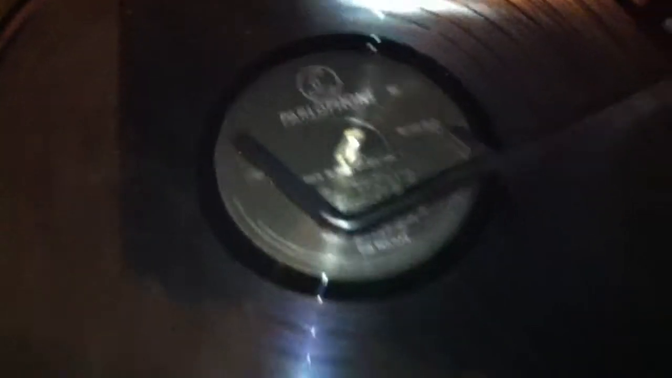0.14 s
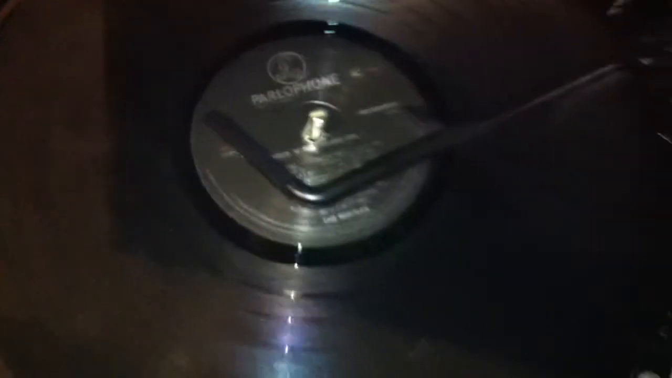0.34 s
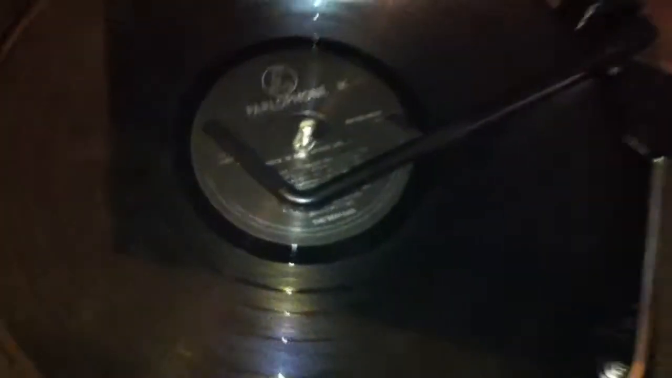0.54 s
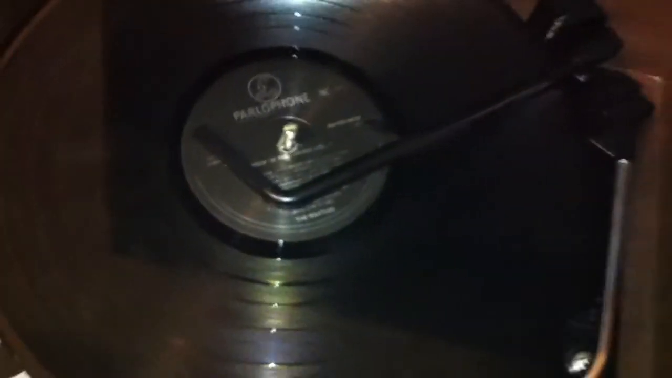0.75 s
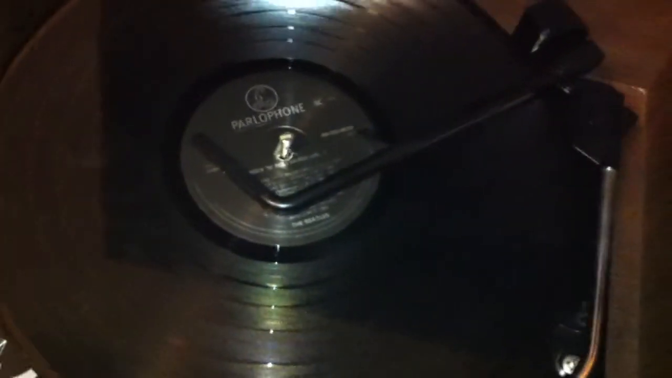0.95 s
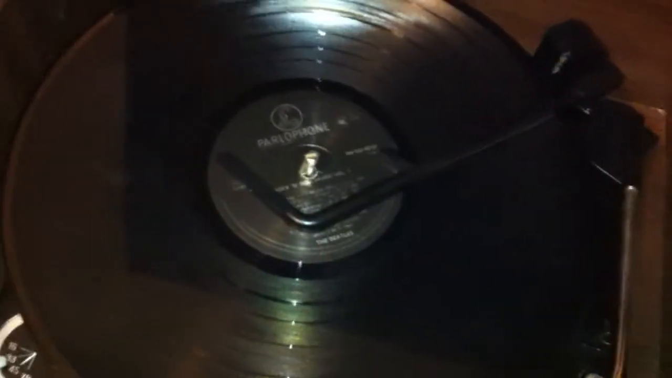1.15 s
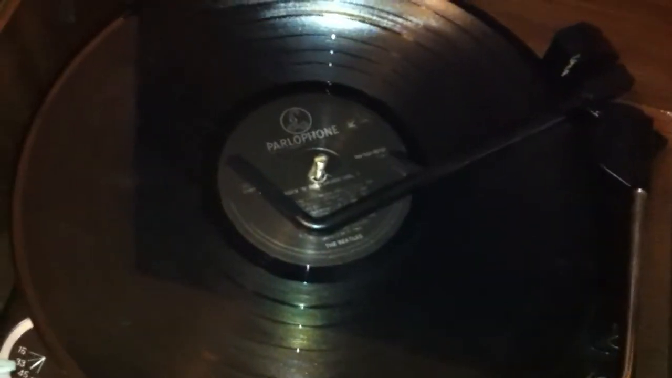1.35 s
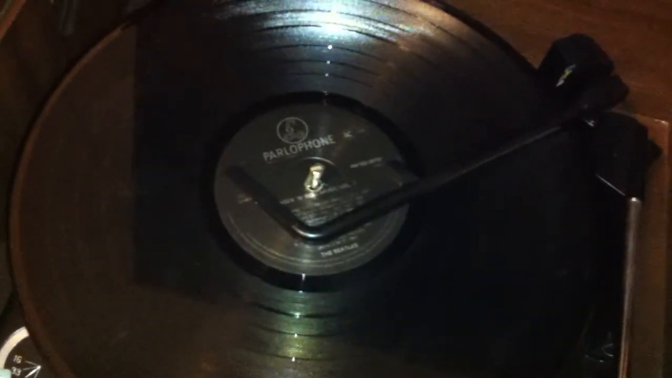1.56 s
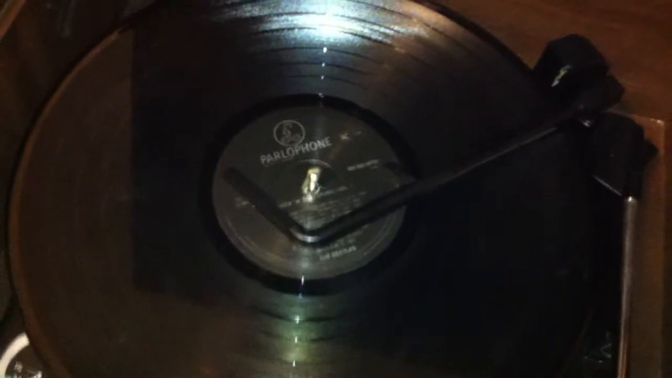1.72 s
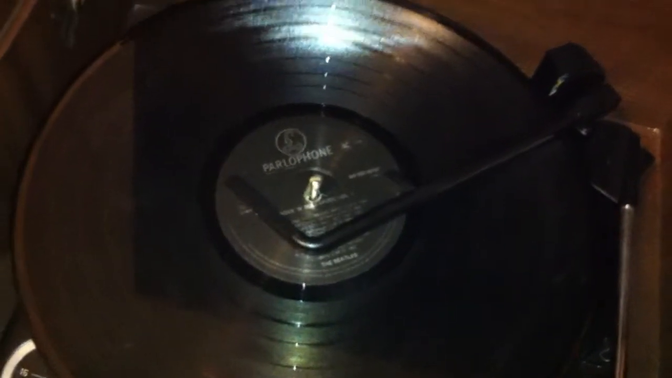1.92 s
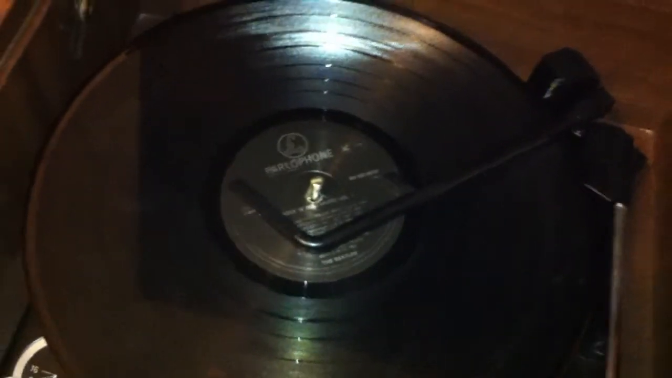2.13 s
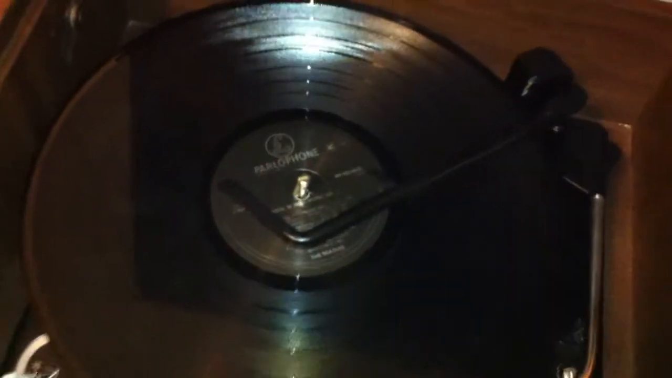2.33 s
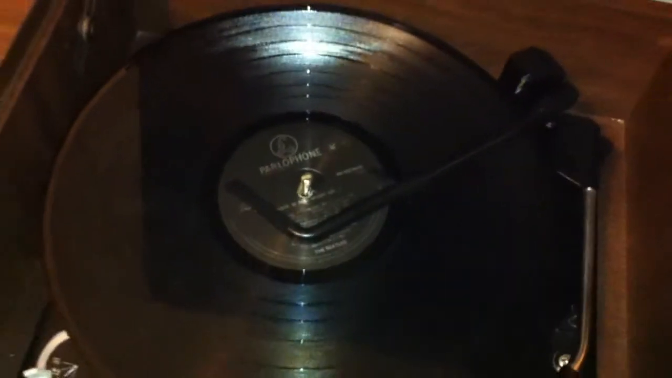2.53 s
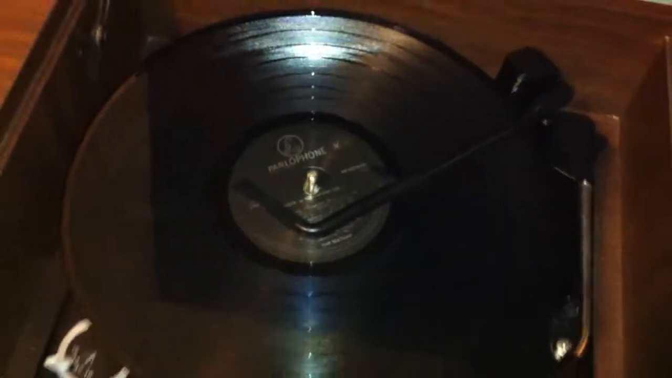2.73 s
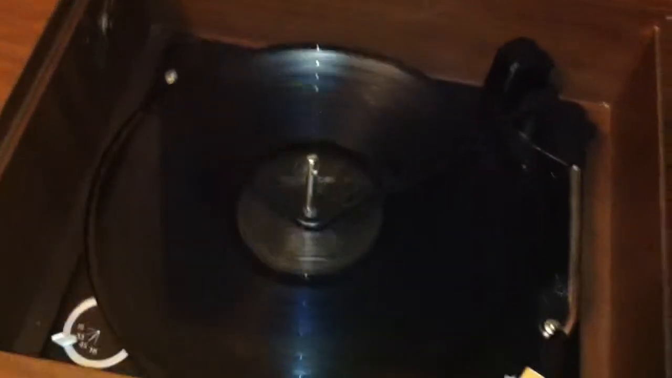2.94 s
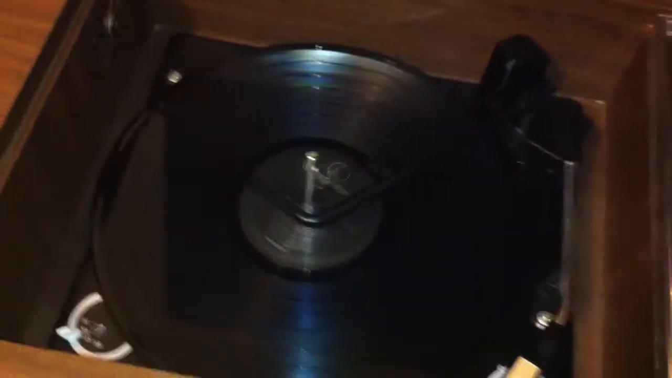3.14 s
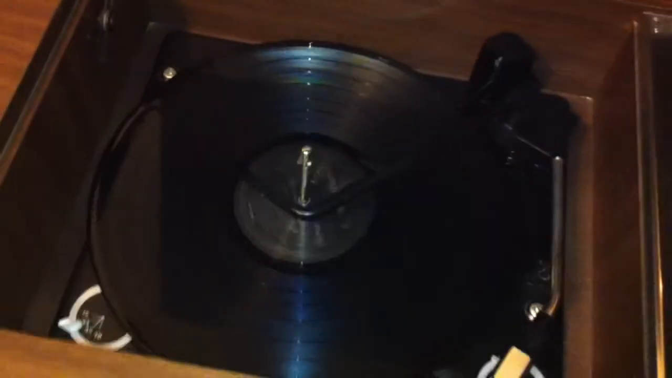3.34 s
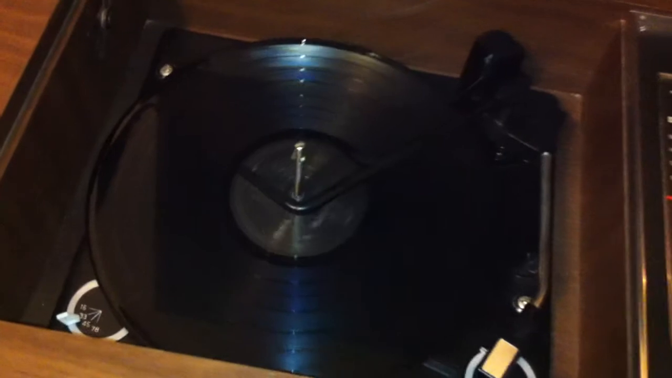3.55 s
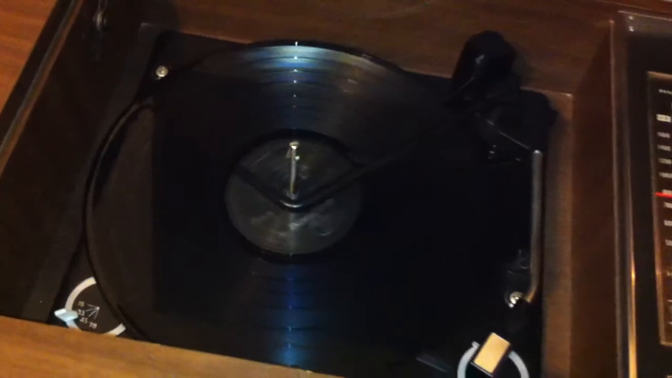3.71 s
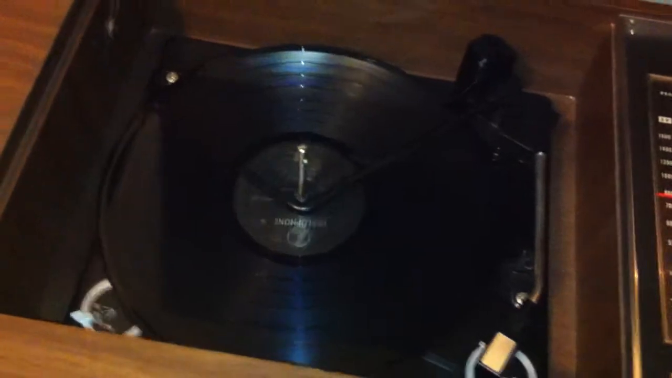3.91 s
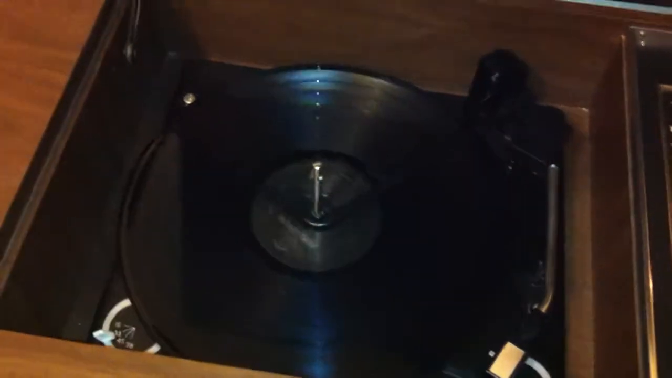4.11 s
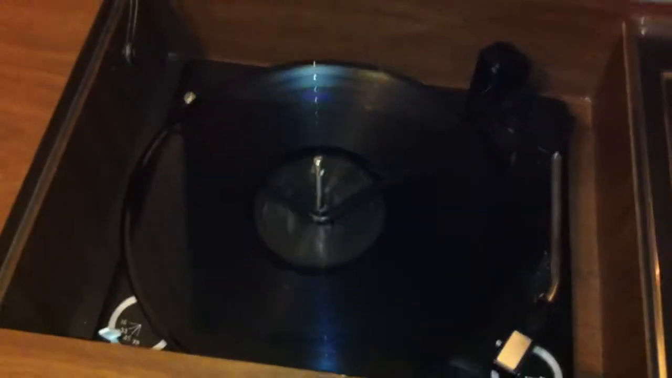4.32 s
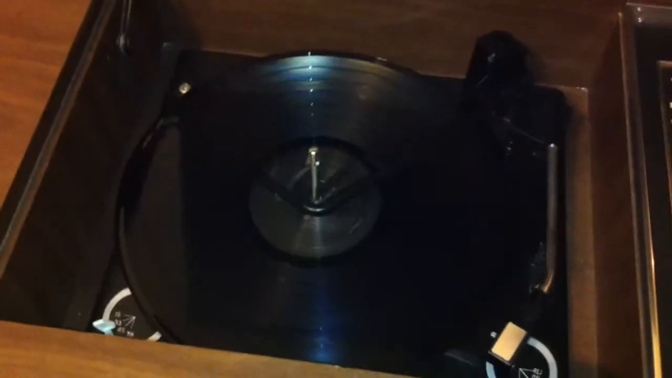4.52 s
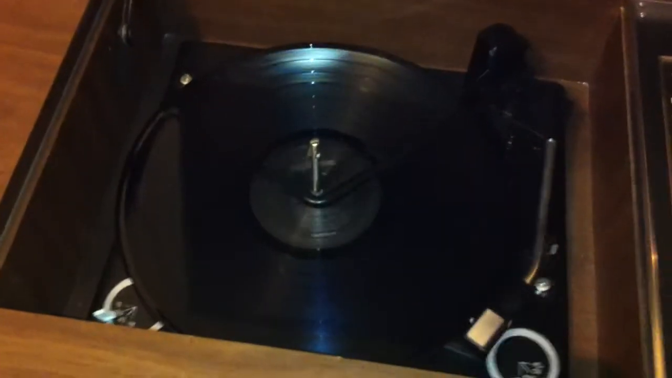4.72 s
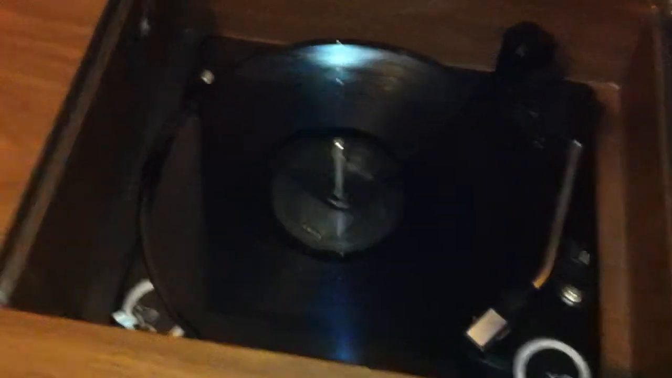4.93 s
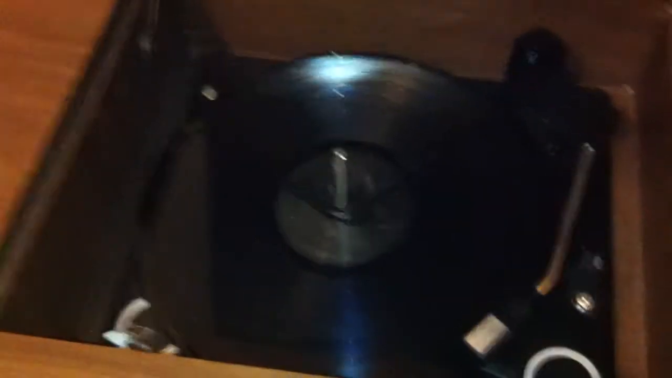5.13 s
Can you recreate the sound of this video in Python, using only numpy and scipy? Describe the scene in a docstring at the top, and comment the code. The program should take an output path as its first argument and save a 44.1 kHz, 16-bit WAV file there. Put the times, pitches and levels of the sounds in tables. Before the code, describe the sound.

An automatic record player in a wooden console, heard close in a quiet room. A steady low electrical hum runs throughout. A cluster of dry lever clicks fades into near stillness with a short squeak, then a loud, hard metallic clunk rattles the steel deck at about three seconds. Hum returns, quieter, with faint rubbing, ticks and soft cabinet thuds as the arm moves.

```python
"""In a quiet room, a record changer starts inside a wooden console.
Levers tick and the mechanism engages with a loud clunk: dying trains of impacts that ring the steel deck.
Cams rub as filtered noise, a squeak and later a faint tonal scrape are noise through resonances, and the arm
lifts with dull thuds, damped sines of the cabinet panels. Mains hum buzzes throughout as wavering sines, over
noise for the room tone."""
import sys
import numpy as np
from scipy import signal
from scipy.fft import rfft, irfft
from scipy.io import wavfile
from scipy.ndimage import uniform_filter1d

SR = 44100
rng = np.random.default_rng(int(sys.argv[2]) if len(sys.argv) > 2 else 0)


def materialize(psi):
    """Save the field psi as 16-bit PCM at rate SR to the path in sys.argv[1].

    A 1-D psi becomes a single channel; in a 2-D psi each row is a channel.
    """
    bounded = np.clip(np.atleast_2d(psi).T, -1, 1)
    quanta = np.round(bounded * 32767).astype(np.int16)
    wavfile.write(sys.argv[1], SR, quanta)


def ratio(d):
    """dB to gain"""
    e = np.asarray(d, float) / 20
    return 10 ** e


N = 232142

# resonances of the steel deck: centre_hz, width_hz, gain_db
DECK_MODES = [(523, 40, 1), (750, 98, 15.5), (900, 70, -9.5), (1049, 17, 12.5), (1375, 34, -2.5),
              (1460, 30, -20.5), (2260, 130, -18), (2920, 85, -10), (3600, 120, -17), (4250, 200, -15),
              (4680, 400, -8.5), (8124, 200, -15.5)]


def rms_one(x):
    """Normalisation of power: scale to unit rms."""
    return x / np.sqrt(np.mean(x ** 2) + 1e-20)


def in_time(rows):
    """Linear interpolation in time: each column of a curve gets one value per sample."""
    s, *columns = np.transpose(rows)
    return [np.interp(np.arange(N) / SR, s, c) for c in columns]


def at_hz(points, hz):
    """Interpolation on a logarithmic frequency axis."""
    table_hz, values = np.array(points).T
    return np.interp(np.log(hz), np.log(table_hz), values)


def band(x, low_hz, high_hz):
    """Band limiting by a Butterworth filter."""
    edges = np.clip([low_hz, high_hz], 15, [.43 * SR, .45 * SR])
    return signal.sosfilt(signal.butter(2, edges, "band", fs=SR, output="sos"), x)


def resonate(x, peaks):
    """Modal superposition: parallel two-pole resonances with alternating signs."""
    out = 0
    for k, (hz, width_hz, db) in enumerate(peaks):
        r = np.exp(-np.pi * width_hz / SR)  # pole radius
        poles = [1, -2 * r * np.cos(2 * np.pi * hz / SR), r * r]
        mode = signal.lfilter([1 - r, 0, r - 1], poles, x + 1e-18)
        out = out + (-1) ** k * ratio(db) * mode
    return out


def drift(rate_hz):
    """Low-pass random process: slow chance of unit rms, computed at every 40th sample."""
    r = np.exp(-80 * np.pi * rate_hz / SR)
    chance = rng.standard_normal(N // 40 + 2002)
    slow = signal.lfilter([1], [1, -2 * r, r * r], chance)[2000:]  # without the filter's start
    return np.interp(np.arange(N) / 40, np.arange(len(slow)), rms_one(slow))


def contacts(rows, spread, ring_db, rise_share, crest_db):
    """Impact excitation: each contact is a dying rattle of tiny impacts, coloured by the part struck,
    that rings the deck. spread is the ratio of band edge to centre."""
    length = 8192
    out, t = np.zeros(N + length), np.arange(length) / SR
    uneven_db = 2.5 * np.minimum(rng.exponential(1, (len(rows), length)), 4)
    grit = rng.standard_normal((len(rows), length)) * ratio(uneven_db)
    spread = max(spread, 1.05)
    for (s, db, hz, treble_db, t60_ms), impacts in zip(rows, grit):
        t60 = max(t60_ms, 4) / 1000
        # long rattles start more softly
        shape = ratio(-60 * t / t60) * (1 - np.exp(-t / (rise_share * t60)))
        # a short blow starts with its hardest impact
        shape = shape * (1 + 0.017 / t60 * np.exp(-t / 0.00064))
        shape = shape / shape.max()
        blow = impacts * shape
        part = rms_one(band(blow, hz / spread, hz * spread))
        broad_snap = rms_one(band(blow, 370, 4500))
        struck = part + ratio(-8.5) * broad_snap
        body = rms_one(struck + ratio(ring_db) * resonate(struck, DECK_MODES))
        crack = band(impacts * shape ** 1.5, 4000, 12500)  # treble dies sooner
        crack = rms_one(signal.lfilter([1], [1, -.6], crack))
        level = ratio(db - crest_db) * np.sqrt(np.mean(shape ** 2))
        at = max(round(s * SR) - 20, 0)
        out[at:at + length] += level * (body + ratio(treble_db) * crack)
    return out[:N]


def broad_contacts():
    """Broad-band impact: parts meet and rattle over a wide band, the clunk among them."""
    # parts meeting: start_s, nominal peak_db, centre_hz, treble_db over the body, t60_ms
    meetings = [(0, -36.5, 2030, -38, 385), (.111, -24, 510, -30.5, 51), (.158, -34, 3230, -13.5, 47),
                (.243, -27.5, 945, -18.5, 57), (.302, -40, 2020, -14, 87), (.412, -31.5, 2780, -12, 48),
                (.523, -43.5, 2600, -14, 53), (.600, -52, 2500, -15, 50), (.615, -47, 700, -18.5, 110),
                (.788, -51, 765, -13, 85), (.908, -50, 1900, -8, 93), (1.483, -51.5, 950, -10, 145),
                (2.681, -52.5, 900, -25, 310), (2.829, -45.5, 970, -19.5, 82), (2.863, -34, 900, -14, 55),
                (2.869, -20.5, 900, -18, 53), (2.895, -17, 1090, -14, 91), (2.908, -25, 1510, -11, 17),
                (2.919, -21, 1620, -1.5, 93), (2.938, -23.5, 1301, -20.5, 160),
                (2.964, -5, 1203, -14.5, 35), (2.971, -1.5, 1000, -16.5, 40), (2.979, -8.5, 1300, -15, 45),
                (2.986, -10, 1130, -19, 31), (3.0085, -3.5, 2000, -14.5, 24), (3.013, -13, 1200, -13, 60),
                (3.028, -13.5, 2210, -14.5, 39), (3.036, -22.5, 1997, -12, 124),
                (3.545, -52.5, 805, -28.5, 170), (3.635, -49.5, 714, -25, 60),
                (4.210, -47.5, 984, -16, 120), (4.245, -52, 1094, -22, 81), (4.340, -48, 1160, -11, 58),
                (4.751, -45, 900, -29, 180), (4.889, -40.5, 717, -26, 94), (5.117, -39, 1300, -19.5, 81)]
    return contacts(meetings, 2.024, ring_db=-5.5, rise_share=0.0057, crest_db=8)


def narrow_contacts():
    """Narrow-band impact: ticks, rings and dying tails, each around one pitch."""
    # narrow-band contacts: start_s, nominal peak_db, centre_hz, treble_db over the body, t60_ms
    pitched_rows = [(.312, -38, 610, -2.5, 57), (.522, -34, 3760, -13, 22), (.643, -45.5, 620, -19, 29),
                    (1.53, -54, 860, -20, 160), (2.356, -54.5, 2900, 7.5, 35), (2.876, -13.5, 900, -31, 26),
                    (3.0095, -1.5, 2750, -12.5, 14), (2.921, -26, 8000, -20, 40),
                    (.249, -35, 1700, -27, 50), (3.923, -47.5, 3600, -20, 76),
                    (3.93, -53.5, 2785, -25, 204), (4.165, -51, 1330, -24.5, 73),
                    (4.460, -51.5, 750, -25, 71), (4.725, -43, 1150, -18.5, 29), (4.866, -43, 900, -26, 55)]
    return contacts(pitched_rows, 1.11, ring_db=-8, rise_share=0.028, crest_db=9)


def thuds():
    """Damped free vibration: a soft push sets a cabinet panel swinging for a few cycles."""
    # dull knocks in the cabinet: start_s, peak_db before the high-pass, pitch_hz near the mode it wakes
    knocks = [(0.113, -37.5, 314), (2.359, -54.5, 182), (2.689, -48, 182), (2.834, -41.5, 243),
              (2.879, -30, 243), (2.919, -32.5, 314), (2.969, -21.5, 243), (2.99, -27, 243),
              (3.009, -35, 243), (3.045, -35, 243), (3.401, -51, 182), (3.446, -50, 182),
              (3.992, -53.5, 182), (4.129, -53.5, 243), (4.165, -52, 243), (4.222, -51, 243),
              (4.254, -55, 243), (4.727, -44, 243), (4.754, -43.5, 243), (4.868, -32.5, 182),
              (4.887, -26.5, 182), (4.929, -48, 182), (4.971, -49, 243), (5.009, -46.5, 314),
              (5.057, -48, 182), (5.113, -43.5, 314), (5.157, -48, 243)]
    # panel modes of the cabinet: mode_hz
    panel_modes = [182, 243, 314]
    t60_s, length = 0.1, 16384
    out, t = np.zeros(N + length), np.arange(length) / SR
    for s, db, pitch_hz in knocks:
        hz = min(panel_modes, key=lambda mode: abs(mode - pitch_hz))
        swing = np.sin(2 * np.pi * hz * t) * ratio(-60 * t / t60_s)
        swing *= (1 - np.exp(-t / 0.001)) ** 2  # soft onset
        at = round(s * SR)
        out[at:at + length] += ratio(db) * swing / np.abs(swing).max()
    # a small panel radiates little deep bass
    return signal.sosfilt(signal.butter(4, 125, "high", fs=SR, output="sos"), out[:N])


def console_shake(metal):
    """Forced vibration: heavy blows shake the whole console, low noise following their rms."""
    blow_rms = np.sqrt(uniform_filter1d(metal ** 2, 900).clip(0))
    return ratio(-33) * blow_rms * rms_one(band(rng.standard_normal(N), 20, 160))


def rubbing(flicker_db):
    """Sliding friction: rough noise, lumpy in the cabinet, smoother in the treble."""
    # parts sliding in the changer: time_s, middle_db, treble_db
    sliding = [(0.0, -57, -53), (0.12, -63.5, -77), (0.5, -65, -78), (0.97, -88, -81.5), (1.26, -73, -76),
               (1.5, -78, -78.5), (1.97, -81.5, -77.5), (2.16, -69, -77.5), (2.35, -67, -70.5),
               (2.82, -71, -75.5), (3.3, -79.5, -79.5), (4.02, -74.5, -76), (4.336, -72.5, -82),
               (4.512, -73, -71.5), (4.784, -67, -65.5), (4.926, -57.5, -73), (5.02, -70, -76),
               (5.138, -71.5, -63), (5.26, -74.5, -64)]
    # two broad resonances that colour the hiss: centre_hz, width_hz, gain_db
    hiss_modes = [(4920, 900, -2), (10700, 440, 2)]
    rumble_db, rumble_follows = -70.5, 0.48  # level at mean rubbing; share of the middle's swing
    middle_db, treble_db = in_time(sliding)
    white, rough = rng.standard_normal((3, N)), flicker_db * drift(25)

    low_db = rumble_db + rumble_follows * (middle_db - middle_db.mean())
    low_db = low_db + 2.5 * drift(15)  # lumps
    low = ratio(low_db) * rms_one(band(white[0], 160, 440))

    dulled = signal.lfilter([1], [1, -.85], white[1])
    on_deck = dulled + ratio(-9) * resonate(dulled, DECK_MODES)
    middle = ratio(middle_db + rough) * rms_one(band(on_deck, 550, 2600))

    hiss = white[2] + resonate(white[2], hiss_modes)
    treble = ratio(treble_db + .4 * rough) * rms_one(band(hiss, 2100, 12500))
    return low + middle + treble


def squeak_and_scrape():
    """Resonant filtering of friction noise: each sound has a quick start, a slow sag, a quick stop."""
    # a squeak, then a faint tonal scrape near the end: start_s, length_s, level_db before the sag
    tonal_rubs = [(0.778, .135, -52), (5.115, .2, -71)]
    # resonances that colour both: centre_hz, width_hz, gain_db
    rub_modes = [(370, 90, 0), (620, 150, -7), (800, 120, -5), (1100, 120, -6), (1657, 60, -4),
                 (4230, 70, -14)]
    edge_s, sag_db_per_s = 0.0071, 51
    t, level = np.arange(N) / SR, 0
    for s, length, db in tonal_rubs:
        gate = np.clip(np.minimum(t - s, s + length - t) / edge_s, 0, 1)
        level = level + gate ** 2 * ratio(db - sag_db_per_s * np.clip(t - s, 0, length))
    ringing = rms_one(resonate(rng.standard_normal(N), rub_modes))
    return level * ratio(2 * drift(30)) * ringing


def hum():
    """Harmonic series: mains multiples and a motor line; the third is steady, the weak ones waver."""
    # course of the hum: time_s, strongest_line_db (rms)
    course = [(0, -56), (1, -58), (2.85, -59), (3.05, -69), (3.3, -69), (3.6, -63.5), (4.4, -63.5),
              (5.26, -64.5)]
    # lines of the hum: multiple of the mains frequency, level_db relative to the strongest
    lines = [(2, -19), (3, 0), (4, -17), (8.6, -24), (9, -25)]
    third_hz = 179.8  # third multiple of the mains
    level_db, = in_time(course)
    phase = 2 * np.pi * third_hz / 3 * np.arange(N) / SR
    out = 0
    for multiple, db in lines:
        waver = (.04 if multiple == 3 else .45) * drift(4)  # moves level and phase together
        line = np.sin(multiple * phase + 2 * np.pi * rng.random() + waver)
        out = out + ratio(db) * (1 + waver) * line
    return np.sqrt(2) * ratio(level_db) * out


def room(x):
    """Diffuse reverberation: dense reflections as noise that dies band by band."""
    # reverberation time: frequency_hz, t60_s
    decay_times = [(100, 0.54), (260, 0.72), (700, 0.35), (1500, 0.33), (3000, 0.4), (5000, 0.17),
                   (8000, 0.2), (13000, 0.2)]
    t, tail = np.arange(SR // 2) / SR, 0
    edges = 70 * 2 ** np.arange(0, 8.1, .5)  # half octaves, Hz
    for low, high in zip(edges, edges[1:]):
        t60_s = at_hz(decay_times, np.sqrt(low * high))
        tail = tail + band(rng.standard_normal(len(t)), low, high) * ratio(-60 * t / t60_s)
    tail = tail * (1 - np.exp(-t / .006))  # reflections build up
    return signal.fftconvolve(x, tail / np.sqrt(np.sum(tail ** 2)))[:N]


def floor():
    """Stationary coloured noise: steady room tone and microphone hiss."""
    # spectrum of the noise: frequency_hz, relative density_db per Hz
    spectrum = [(20, -13.5), (40, -29.5), (70, -27), (110, -9), (200, -8.5), (320, -9.5), (400, -24),
                (1000, -20.5), (2400, -25.5), (6000, -28.5), (14700, -32.5), (16000, -29)]
    hz = np.maximum(np.fft.rfftfreq(N, 1 / SR), 1)
    hiss = irfft(rfft(rng.standard_normal(N)) * ratio(at_hz(spectrum, hz)), N)
    return ratio(-67) * rms_one(hiss)


def scene():
    """Linear superposition: all sources, and the reverberation of the hits, at one microphone."""
    metal, pitched, panel = broad_contacts(), narrow_contacts(), thuds()
    hits = metal + pitched + panel
    # small close parts wake the room less
    into_room = metal + ratio(-7) * pitched + ratio(-4.5) * panel
    mix = hits + ratio(-12.5) * room(into_room) + console_shake(metal)
    mix = mix + squeak_and_scrape() + rubbing(flicker_db=1.5) + hum() + floor()
    return np.atleast_2d(mix)


def band_limit(x):
    """A steep low-pass at the top of the band."""
    return signal.sosfilt(signal.butter(12, 16640, fs=SR, output="sos"), x)


def record(dry):
    """Band limitation: the very top is dull, 25 dB down above 15.9 kHz."""
    hz = np.fft.rfftfreq(N, 1 / SR)
    dulled = irfft(rfft(dry) * ratio(-25 * (hz > 15900)), N)
    return band_limit(dulled)


dry = scene()
out = record(dry)
materialize(out)
```